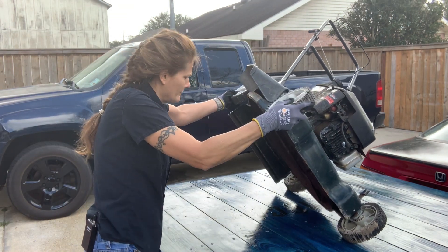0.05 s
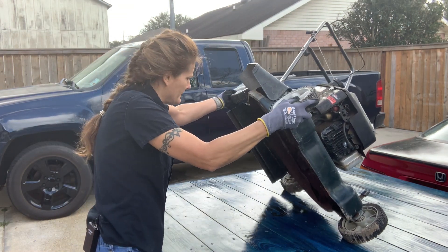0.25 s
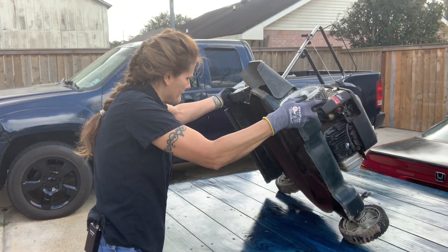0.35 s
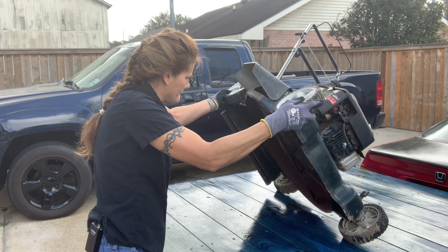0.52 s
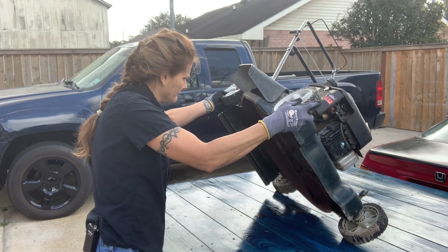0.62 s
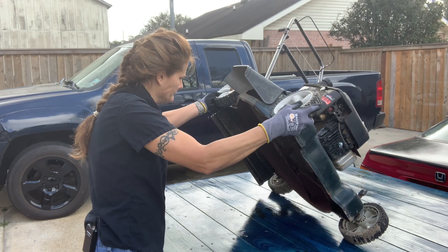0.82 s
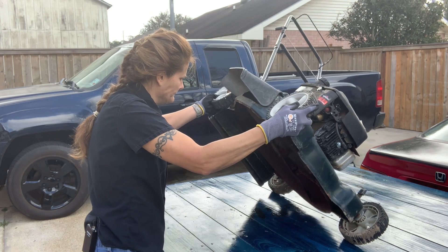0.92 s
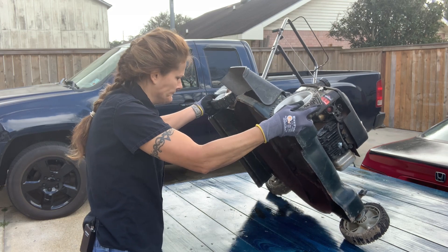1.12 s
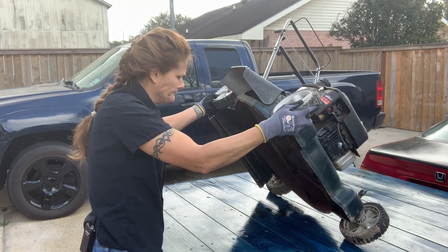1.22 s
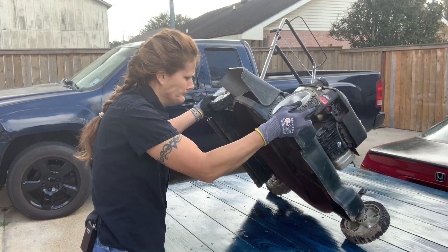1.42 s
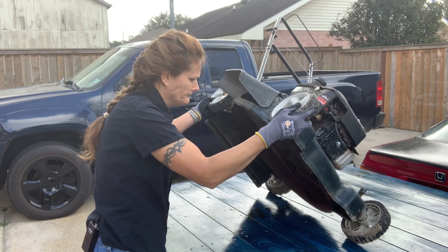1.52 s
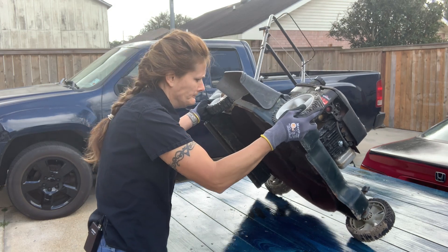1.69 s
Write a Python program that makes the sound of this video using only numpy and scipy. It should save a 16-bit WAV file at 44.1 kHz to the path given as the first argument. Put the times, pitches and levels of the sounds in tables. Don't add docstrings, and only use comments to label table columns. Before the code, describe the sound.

Metal mower scraping across a wooden table in a yard, squealing first, then knocking and ticking

```python
import sys
import numpy as np
from scipy import signal
from scipy.fft import rfft, irfft, next_fast_len
from scipy.io import wavfile
from scipy.ndimage import uniform_filter1d, map_coordinates

SR = 44100
rng = np.random.default_rng(int(sys.argv[2]) if len(sys.argv) > 2 else 0)


def linear_from_db(decibels):
    return 10 ** (np.asarray(decibels, float) / 20)


def bounce(signal):
    frames = np.transpose(np.atleast_2d(signal))
    limited = np.clip(frames, -1, 1)
    pcm = np.round(limited * 32767).astype(np.int16)
    wavfile.write(sys.argv[1], SR, pcm)


N = 77175


def unit(x):
    return x / np.sqrt(np.mean(x ** 2) + 1e-20)


def along(points, hz):
    f, v = np.transpose(points)
    return np.interp(np.log(hz + 1), np.log(f + 1), v)


def curves(rows, outside=None):
    s, *columns = np.transpose(rows)
    return [np.interp(np.arange(N) / SR, s, c, outside, outside) for c in columns]


def wobble(rate):
    knots = rng.standard_normal(int(N * rate / SR) + 4)
    return map_coordinates(knots, [np.arange(N) * rate / SR])


def filtered(x, response):
    m = next_fast_len(len(x) + SR // 2)
    return irfft(rfft(x, m) * response(np.fft.rfftfreq(m, 1 / SR)), m)[:len(x)]


def body(peaks):
    def response(f):
        total = 0
        for k, (centre, width, db) in enumerate(peaks):
            band = 1j * f * width
            total = total + (-1) ** k * linear_from_db(db) * band / (centre ** 2 - f ** 2 + band)
        return total
    return response


def add(track, s, sound):
    part = track[round(s * SR):][:len(sound)]
    part += sound[:len(part)]


# time in seconds, pressure in dB, squeal in dB, board rumble in dB,
# the last two relative to the pressure.
DRAG_STROKES = [
    [(.05, -90.5, -18, 23), (.2, -61.5, 6, 12), (.226, -45.5, 6, -1.5), (.245, -35.5, -6, -1.5),
     (.33, -35, -4, -13), (.418, -33.5, -1, -7.5), (.438, -46.5, -4, -0.5), (.46, -65.5, 7, 10),
     (.525, -71.5, -10, 14.5)],
    [(.532, -40, -10, -18), (.545, -43.5, 9, 4), (.572, -90, -10, 33.5)],
    [(.646, -36.5, -6, -6), (.71, -37.5, -28, 1), (.755, -37.5, -17, -5), (.775, -33, 9.5, 3),
     (.788, -57, 10.5, 21), (.85, -64, 20, 24.5)],
    [(.853, -45, 10, 10.5), (.872, -34.5, -14, -3.5), (.89, -33.5, 5.5, -9.5), (.93, -36, 3.5, -3.5),
     (.945, -38, -36, -2), (1.066, -34, -4, -3.5), (1.104, -38.5, 0, -0.5), (1.125, -63.5, -21, 16),
     (1.31, -74, -17, 9)],
]
# time in seconds, length in seconds, pressure change in dB.
EDGE_GRIPS = [(0.648, 0.0068, -6.5), (0.657, 0.0058, -12), (0.735, 0.0025, -7), (0.744, 0.0019, 7),
              (.962, 0.0022, 3.5), (0.97, 0.0028, -20), (.977, 0.0033, -17), (0.989, 0.0035, 0)]
# time in seconds, pitch in Hz, extra level of the lowest order in dB.
SQUEAL_PITCH = [(.22, 765, -7), (.27, 779, 8.5), (.325, 767, 3.5), (.35, 790, 8.5), (.392, 816, 1.5),
                (.405, 807, -3), (.44, 805, -4), (.6, 791, -12), (1.1, 792.8, -18)]
# order (multiple of the pitch), level in dB.
SQUEAL_HARMONICS = [(1, -1.5), (2, -4.5), (3, -2.5), (4, -14)]
# centre in Hz, width in Hz, level in dB.
DECK_UPRIGHT = [(1277, 98, -10), (1487, 23, -0.5), (1580, 33, 5), (1730, 120, -5.5), (2230, 31, -4),
                (2993, 66, -15), (3064, 79, -10.5), (3745, 83, -1), (4110, 145, -9), (5210, 310, -5),
                (5680, 71, -6), (6140, 92, -7), (8230, 530, -14.5), (10200, 1120, -17.5)]
# centre in Hz, width in Hz, level in dB.
DECK_LEANING = [(842, 77, -7), (1287, 94, -1.5), (1569, 9.2, 1.5), (1800, 35, 4.5), (2030, 64, -1.5),
                (2400, 15.5, 2.5), (3680, 80, -5), (4065, 46, -2.5), (5080, 370, -10), (5630, 220, -6),
                (6180, 410, -13.5), (8400, 430, -12), (10490, 310, -24), (11000, 290, -22.5)]
# frequency in Hz, level in dB per Hz.
DECK_RASP = [(350, -7.5), (600, -38), (1450, 5), (2910, -2.5), (4500, -14.5), (5400, -6), (7100, -25),
             (8620, -23), (16000, -33)]
# centre in Hz, width in Hz, level in dB.
BOARD_MODES = [(105.5, 18.5, 5.7), (169, 57, -3.1), (192.4, 20, 1.7), (272.8, 15.4, 1.8), (357, 56, 1.8),
               (514, 87, 1.4), (791, 104, 0)]


def scrape():
    t = np.arange(N) / SR
    press, squeal, rumble = np.zeros((3, N))
    for rows in DRAG_STROKES:
        _, squeal_db, rumble_db = curves(rows)
        gain = linear_from_db(curves(rows, outside=-150)[0])
        press = press + gain
        squeal = squeal + gain * linear_from_db(squeal_db)
        rumble = rumble + gain * linear_from_db(rumble_db)
    for s, length, db in EDGE_GRIPS:
        press = press * linear_from_db(db * np.exp(-((t - s) / length * 2) ** 2))

    slips_per_s, slip_scatter_db, hiss_share = 1600, 1, 0.48
    chance = slips_per_s / SR
    slips = (rng.random(N) < chance) * linear_from_db(slip_scatter_db * rng.standard_normal(N))
    drive = press * (unit(slips) + hiss_share * rng.standard_normal(N))

    tilted = t > 0.5
    probe = rng.standard_normal(N)

    def ring(x, response):
        return filtered(x, response) / np.std(filtered(probe, response))

    steel = ring(drive * ~tilted, body(DECK_UPRIGHT)) + ring(drive * tilted, body(DECK_LEANING))
    steel += linear_from_db(-3.5) * ring(drive, lambda f: linear_from_db(along(DECK_RASP, f)))

    pitch, lowest_db = curves(SQUEAL_PITCH)
    jitter = 0.022 * np.where(tilted, 0.12, 1)
    turn = 2 * np.pi * np.cumsum(pitch * (1 + jitter * wobble(160))) / SR
    tone = np.zeros(N)
    for k, db in SQUEAL_HARMONICS:
        level = db + lowest_db * (k == 1) + 2.6 * wobble(70.6)
        level = level - 15 * tilted * (k != 2)
        tone += linear_from_db(level) * np.sin(k * turn)

    boards = ring(rumble * rng.standard_normal(N), body(BOARD_MODES))
    return steel + uniform_filter1d(squeal, size=200) * tone + boards


def click(colour, db, t60):
    t = np.arange(SR // 10) / SR
    a, b = rng.standard_normal((2, len(t)))

    def deck_colour(f):
        return colour(f) * (1 + 8.1 * abs(body(DECK_LEANING)(f))) / (1 + (f / 7000) ** 2)

    sharp = unit(filtered(a, colour)) * linear_from_db(-60 * t / (0.24 * t60))
    tail = unit(filtered(b, deck_colour)) * linear_from_db(-60 * t / t60)
    return linear_from_db(db - 12) * (sharp + 0.6 * tail)


# frequency in Hz, level in dB.
CREAK_TONE = [(900, -29), (1600, -0.5), (2100, -2.5), (4000, 2), (7000, -5.5), (13000, -10.5), (16000, -26)]
# start in seconds, peak in dB.
SINGLE_SLIPS = [(0.0338, -38.5), (0.0547, -32), (0.0823, -31), (0.1028, -36), (0.107, -34.5),
                (0.123, -31.5), (0.1331, -40.5), (0.1427, -33), (0.1542, -33), (0.1749, -31), (0.1854, -36),
                (0.1989, -29.5), (0.2065, -35), (0.5325, -40), (0.647, -30), (.652, -30), (0.664, -32),
                (0.698, -35), (.7325, -21), (0.8091, -27), (.8595, -46), (0.8755, -22.5), (0.96, -54),
                (0.9637, -28), (0.9712, -25.5), (0.9808, -34), (.992, -30)]


def creaks():
    out = np.zeros(N)
    for s, db in SINGLE_SLIPS:
        add(out, s, click(lambda f: linear_from_db(along(CREAK_TONE, f)) * (f > 600), db, t60=0.052))
    return out


# start in seconds, peak in dB,
# pitch in Hz.
PITCHED_CLICKS = [(.606, -55, 3730), (.6352, -42, 4000), (.795, -21, 1230), (.813, -22, 1900),
                  (.824, -24, 1020), (1.1894, -37, 1800), (1.1905, -38, 3640), (1.215, -52, 3700),
                  (1.2465, -44, 3700), (1.27, -47, 3500), (1.22, -47, 1800), (1.2446, -54, 7000),
                  (1.2555, -37.5, 2140), (1.333, -40, 1050), (1.336, -50, 4900), (1.3388, -29, 2400),
                  (1.3392, -47, 8050), (1.346, -55, 7000), (1.368, -56, 5500), (1.409, -49.5, 6000),
                  (1.4243, -42, 5500), (1.4245, -44, 2000), (1.443, -54, 3800), (1.452, -43, 2300),
                  (1.4587, -53, 7960), (1.478, -42, 2300), (1.4955, -44, 2270), (1.558, -50, 4100),
                  (1.5582, -57, 8000), (1.5643, -45.5, 4200), (1.5645, -53.5, 7500)]


def ticks():
    out = np.zeros(N)
    for s, db, hz in PITCHED_CLICKS:
        def colour(f):
            near_pitch = np.exp(-(np.log((f + 1) / hz) / 0.68) ** 2)
            return linear_from_db(-39 * (1 - near_pitch)) * (f > 600)
        add(out, s, click(colour, db, t60=0.048))
    return out


# pitch in Hz, level in dB, decay time T60 in seconds.
WOOD_MODES = [(100, 4, 0.12), (144, -3.5, 0.17), (189.5, -2, 0.12), (373, 1.5, 0.067), (531, -4, 0.095),
              (603, 6, 0.036), (790, -8, 0.054), (982, -3.5, 0.036), (1460, -22, 0.086)]
# start in seconds, peak in dB, heaviness from 0 to 1.
BOARD_KNOCKS = [(0.0235, -41.5, 0.47), (0.2085, -30.5, 0.77), (.255, -33, 0.74), (.3, -35.5, 0.93),
                (0.369, -34.5, 0.78), (0.534, -53, 0.4), (0.618, -31, 0.7), (0.7681, -18, 0.86),
                (.777, -36, 0.5), (0.811, -28, 0.96), (0.827, -26.5, 0.14), (1.052, -26, 0.69),
                (1.191, -34.5, 0), (1.2561, -36.5, 0.16), (1.3396, -25, 0.32), (1.356, -51, 0.92),
                (1.426, -29.5, 0.52), (1.437, -37.5, 0.43), (1.444, -52, 0.56), (1.479, -39, 0.53),
                (1.593, -37, 0.63), (1.692, -37, 0.64)]


def knocks():
    out, t = np.zeros(N), np.arange(SR // 4) / SR
    push_s, splinter_t60 = 0.0018, 0.03
    for s, db, heavy in BOARD_KNOCKS:
        ring = np.zeros(len(t))
        for hz, level, t60 in WOOD_MODES:
            level_luck, pitch_luck = rng.standard_normal(2)
            deep_db = -13 * (heavy - 0.5) * np.log2(hz / 400)
            damp_db = -10 * heavy ** 4
            gain = linear_from_db(level + 1.88 * level_luck - 60 * t / t60 + damp_db + deep_db)
            ring += gain * np.sin(2 * np.pi * hz * (1 + 0.02 * pitch_luck) * t)
        ring *= 1 - np.exp(-t / 0.0012)
        grit = filtered(rng.standard_normal(len(t)),
                        lambda f: f / 600 / (1 + (f / 600) ** 2) / (1 + (f / 3200) ** 4))
        splinter = (1 - heavy) * linear_from_db(-1 - 60 * t / splinter_t60) * unit(grit)
        u = t / push_s
        push = heavy ** 2 * linear_from_db(14.0) * u * (2 - u) * np.exp(1 - u)
        add(out, s, linear_from_db(db - 9) * (ring + splinter - push))
    return out


# start in seconds, level in dB.
TABLE_JOLTS = [(0.201, -23.5), (.3, -29.5), (0.368, -35), (0.439, -32.5), (0.496, -34.5), (0.608, -31),
               (.73, -32), (0.766, -27.5), (.85, -23), (0.921, -29), (1.04, -20.5), (1.134, -23.5),
               (1.17, -32), (1.252, -33), (1.308, -34.5), (1.409, -34.5), (1.445, -52), (1.53, -40.5),
               (1.64, -44)]


def sway():
    sway_hz, rise_s, t60, rest_db = 47.07, 0.015, 0.19, -57.5
    t = np.arange(N) / SR
    size = np.full(N, linear_from_db(rest_db))
    for s, db in TABLE_JOLTS:
        u = np.clip(t - s, 0, None)
        size += linear_from_db(db - 60 * u / t60) * (1 - np.exp(-(u / rise_s) ** 2))
    turn = 2 * np.pi * np.cumsum(sway_hz * (1 + 0.12 * wobble(20.12))) / SR
    overtone = 0.083 * wobble(30.95) * np.sin(1.7 * turn)
    return np.sqrt(2) * size * (np.sin(turn) + overtone + 0.64 * wobble(44.12))


# frequency in Hz, decay time T60 in seconds.
FENCE_DECAY = [(200, 0.38), (2000, 0.2), (10000, 0.012)]


def fence(x):
    hz, t, z = signal.stft(rng.standard_normal(SR // 3), SR, nperseg=256)
    decay = linear_from_db(-60 * t / along(FENCE_DECAY, hz)[:, None])
    tail = signal.istft(z * decay, SR, nperseg=256)[1]
    delayed = np.pad(x, (300, 0))
    return linear_from_db(-15.5) * signal.fftconvolve(delayed, tail / np.linalg.norm(tail))[:N]


# frequency in Hz, level in dB per Hz.
YARD_AIR = [(15, 7.5), (35, -0.5), (90, -8.5), (230, -8.5), (450, -9), (1890, -24), (3820, -30.5),
            (16000, -49.5)]


def yard():
    t = np.arange(N) / SR
    unrest_db = 2.5
    air = unit(filtered(rng.standard_normal(N), lambda f: linear_from_db(along(YARD_AIR, f))))
    air *= linear_from_db(-53 + unrest_db / 2 * wobble(10.75))

    settle_s, settle_t60 = 1.095, 0.65
    settle = (t > settle_s) * linear_from_db(-44 - 60 * (t - settle_s) / settle_t60 + unrest_db * wobble(45.43))
    grit = unit(filtered(rng.standard_normal(N),
                         lambda f: f / 300 / (1 + (f / 300) ** 2) / (1 + (f / 3000) ** 3)))

    chirp_s, chirp_length_s, chirp_hz = 1.642, 0.088, 3850
    u = np.clip((t - chirp_s) / chirp_length_s, 0, 1)
    swell = np.clip(np.sin(np.pi * u), 0, None) ** 0.5 * linear_from_db(-69 + 2.7 * wobble(94.2))
    bird = swell * np.sin(2 * np.pi * chirp_hz * t + 2.6 * wobble(400))
    return air + settle * grit + bird


def dead_input():
    t = np.arange(N) / SR
    buzz = sum(linear_from_db(-99.2 - 2.3 * k) * np.sin(2 * np.pi * 400 * (k + 1) * t) for k in range(10))
    return linear_from_db(-91.5) * rng.standard_normal(N) + np.sqrt(2) * buzz + linear_from_db(-100.2) * wobble(60)


def scene():
    near = scrape() + creaks() + ticks() + knocks()
    left = 2 * (near + fence(near) + sway() + yard())
    return np.array([left, np.zeros(N)])


def band_limit(x):
    return signal.sosfilt(signal.butter(12, 15830, fs=SR, output="sos"), x)


def record(dry):
    live = filtered(dry[0], lambda f: 1 / (1 + (f / 15400) ** 12))
    return band_limit(np.array([live, dead_input()]))


dry = scene()
out = record(dry)
bounce(out)
```